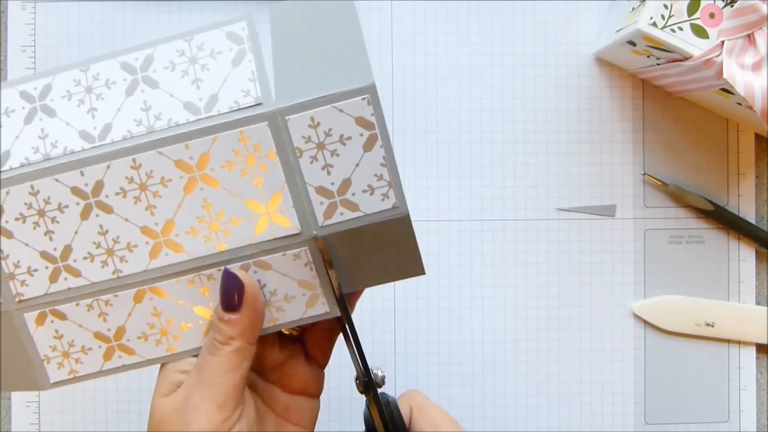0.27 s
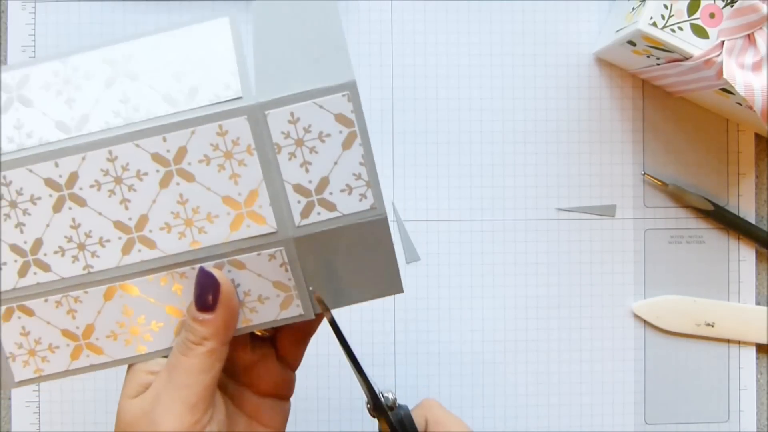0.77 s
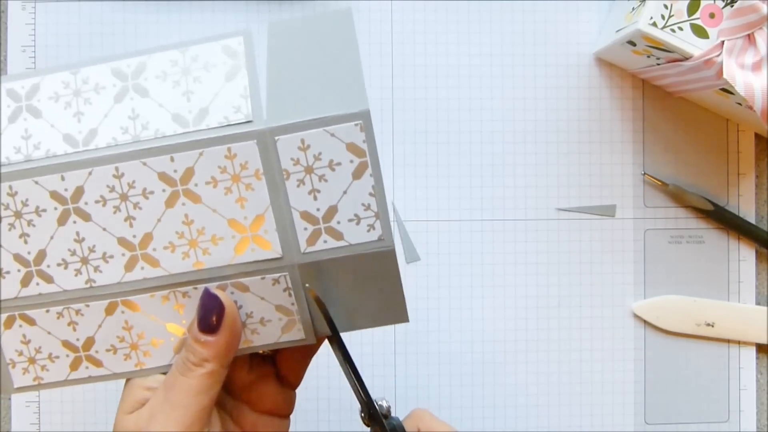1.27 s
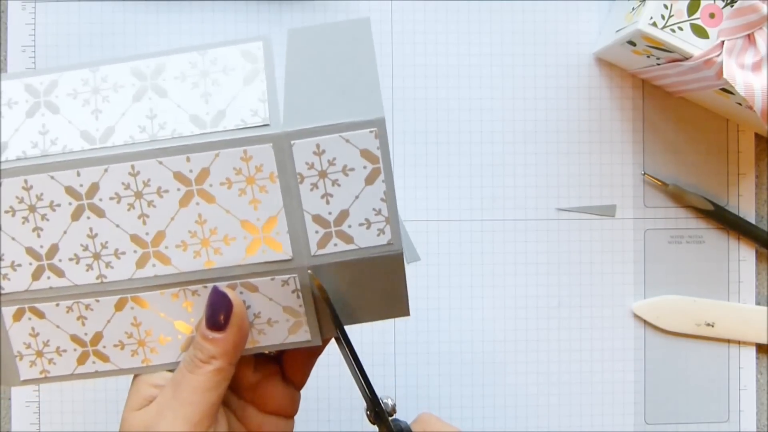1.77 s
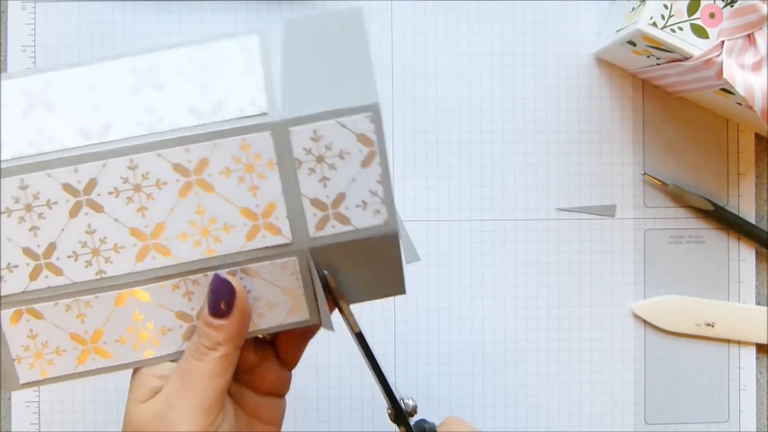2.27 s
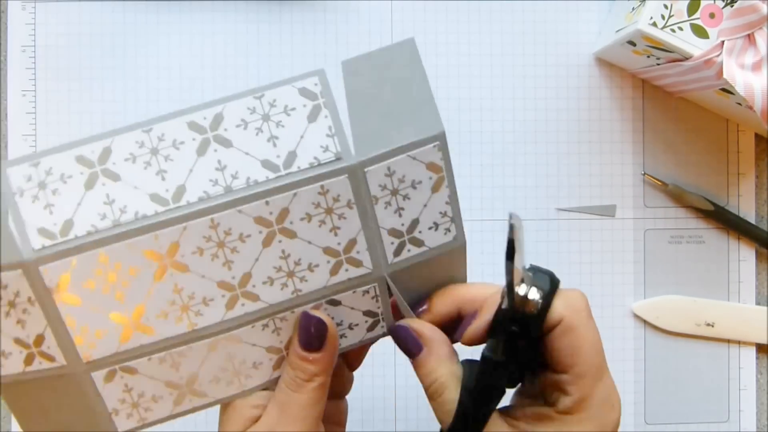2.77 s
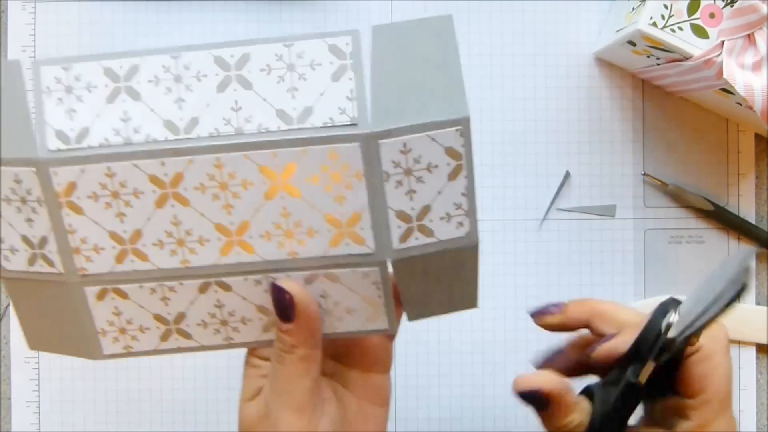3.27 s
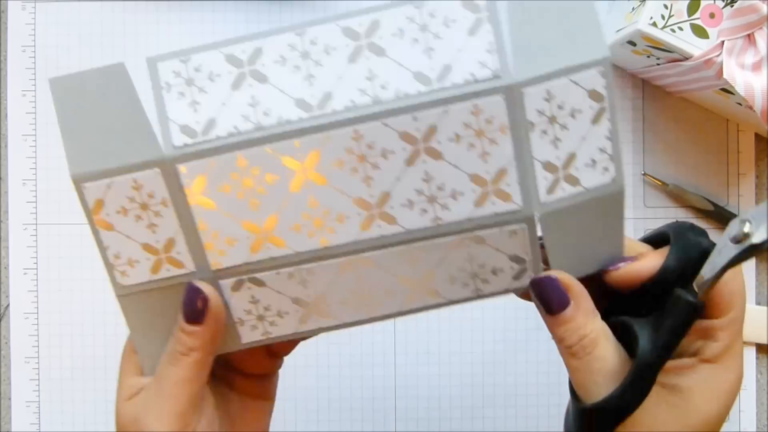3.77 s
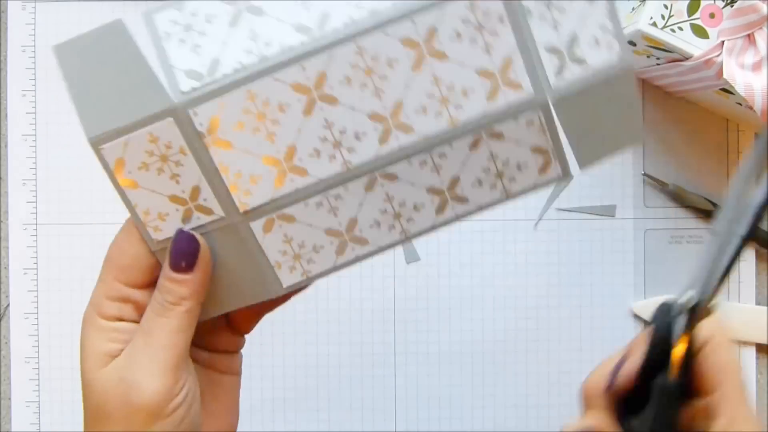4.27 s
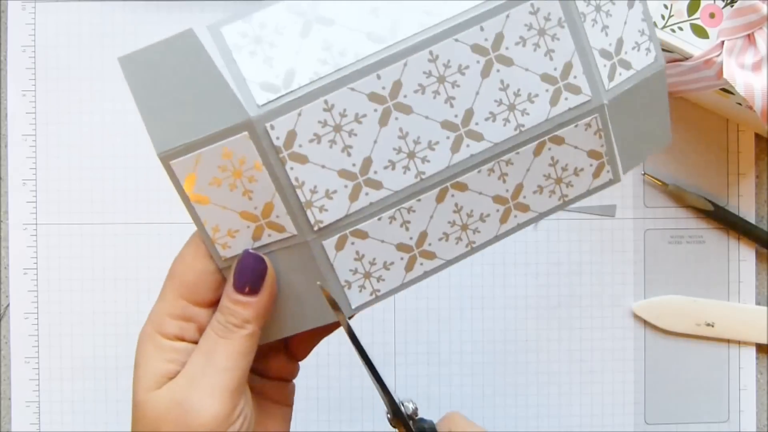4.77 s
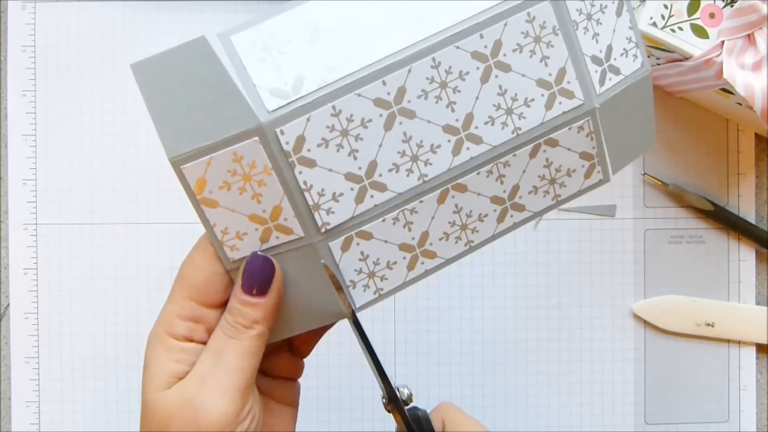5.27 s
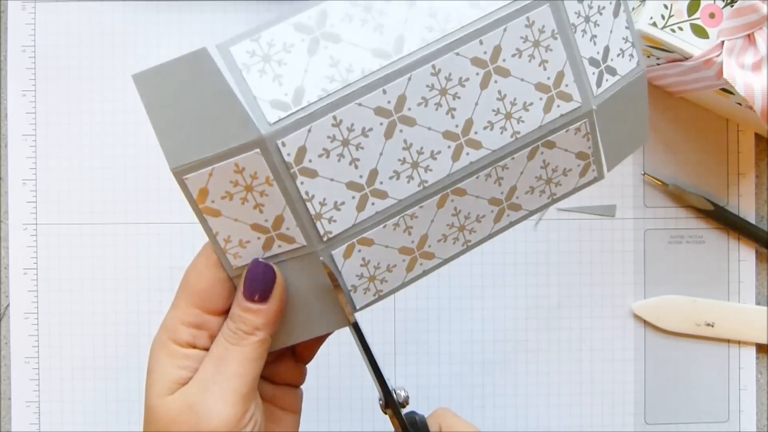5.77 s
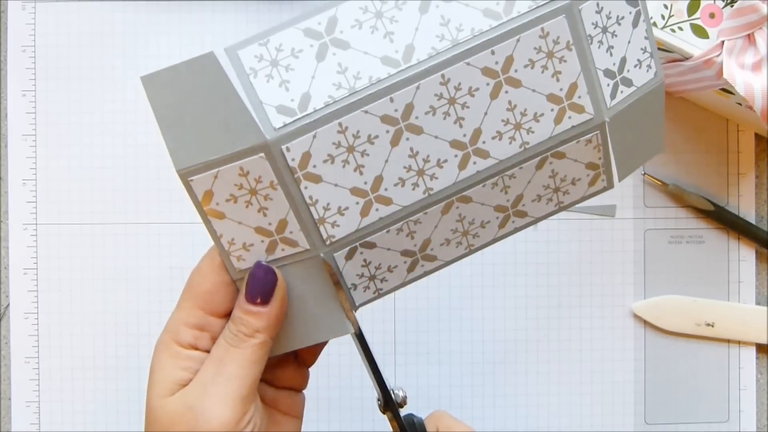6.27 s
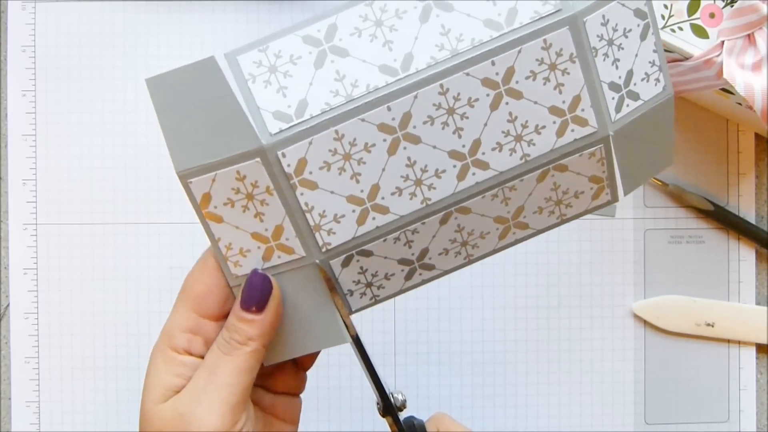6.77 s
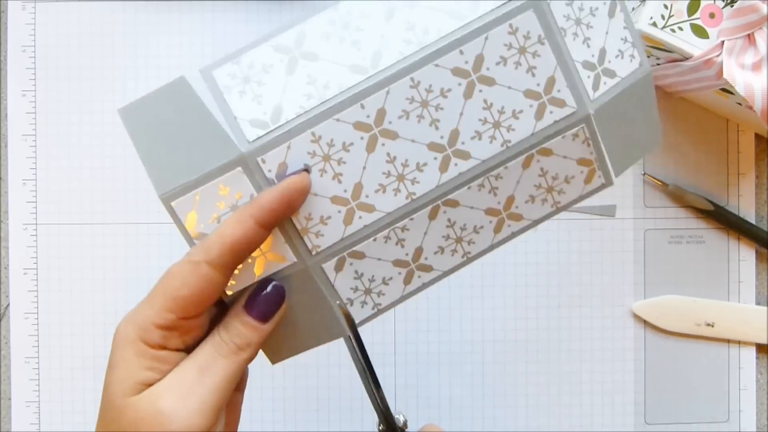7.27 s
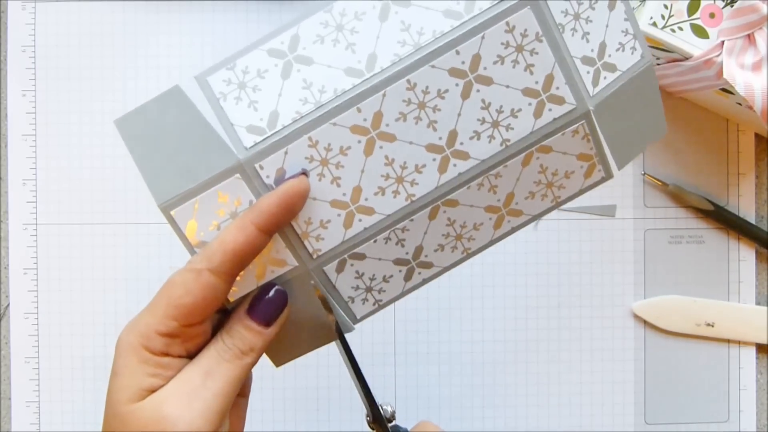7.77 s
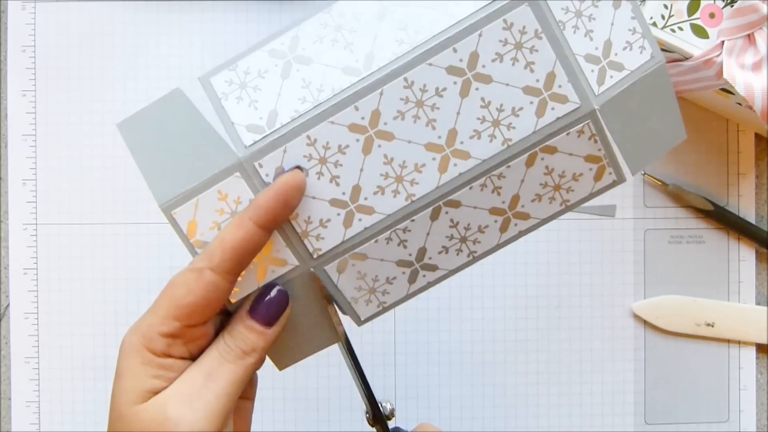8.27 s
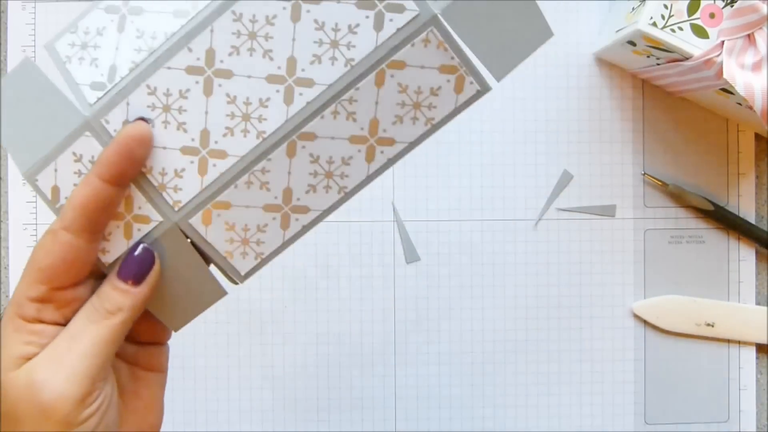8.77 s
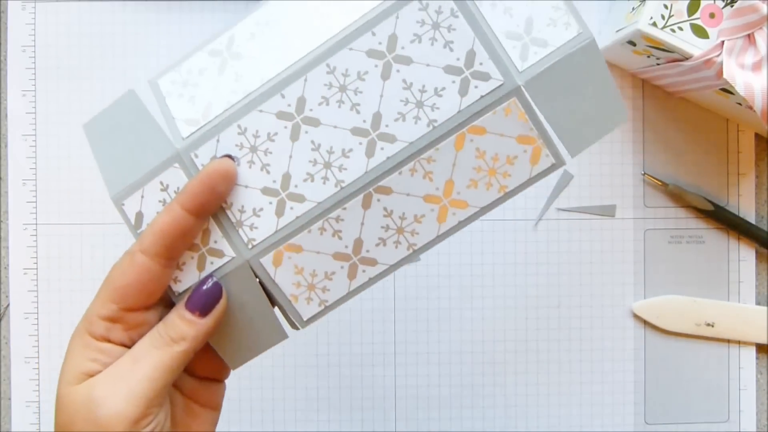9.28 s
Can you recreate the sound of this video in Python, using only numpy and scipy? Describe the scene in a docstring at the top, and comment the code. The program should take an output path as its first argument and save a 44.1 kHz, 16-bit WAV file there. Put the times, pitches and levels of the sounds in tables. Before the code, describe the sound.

Quiet indoor room tone, soft hiss with faint low rumble, close stereo microphones. Tiny card ticks open, with a short gritty snip at 0.4 s, a light slide around 1.1 and crisp crunches from 1.5 to 2.3, with a sharp snap near 1.9. From 2.4 to 4.3 the card is handled: dry papery taps, small high blade clinks, soft rustling slides. At about 4.4 a bright metallic scrape and clinks with hard card snaps; another steel tick at 4.7. Slow cutting from 5.5 to 6.7, a grainy crackle of fibres parting in little ticks. Fingers rub and tap the card from 6.8 to 7.5. Finer, brighter crackling cuts run 7.75 to 8.6, closing with a snip and clink. At 9.0 the scissors are laid down: loud knock, high metallic rattle, rustle, then a deeper woody thump at 9.3 dying away.

```python
"""Small steel scissors cut slowly through card held over a craft table in a quiet room.
From the outset lie the room's hum and hiss and a far rumble, both shaped noise; card snaps as filtered bursts.
Then fibres tear as clumped grains, loose blades clink in steel modes, rubs sing in one resonance,
and fingers slide as a dense rustle. Later contacts ring clear notes; at the end the scissors are laid down.
Feedback delays give the room's echo; two close microphones hear the treble differently."""
import sys
import numpy as np
from scipy import signal
from scipy.fft import rfft, irfft, next_fast_len
from scipy.io import wavfile
from scipy.ndimage import uniform_filter1d

SR = 44100
rng = np.random.default_rng(int(sys.argv[2]) if len(sys.argv) > 2 else 0)


def unload_audio(sound):
    """Save the sound as a 16-bit wav file, at the path given as the first command line argument."""
    columns = np.transpose(np.atleast_2d(sound))
    # keep every value between -1 and 1, then stretch to whole-number steps
    steps = np.round(np.clip(columns, -1, 1) * 32767)
    wavfile.write(sys.argv[1], SR, steps.astype(np.int16))


N = 420713

# Spectrum of the room tone. Each row: frequency in Hz, relative spectral level in dB per Hz.
ROOM_SPECTRUM = [(35, -52), (72, -12.5), (100, -5), (238, -9.5), (280, -7), (353, -8.5), (513, -11.5),
                 (632, -13.5), (694, -12), (940, -8.5), (1030, -13.5), (1270, -13), (2180, -20.5),
                 (2880, -20.5), (15800, -28)]
# Course of the far rumble. Each row: time in seconds, level in dB.
RUMBLE_COURSE = [(0, -72.5), (2.92, -72.5), (3.05, -66), (5.21, -69), (5.42, -77), (9.54, -79)]
ROOM_TONE_DB = -62

# The card snaps or knocks on hand and table.
# Each row: start in seconds, snap drive in dB, thud drive in dB, rattle t60 in seconds.
KNOCKS = [(.0313, -40.5, -62, 0.043), (.054, -39.5, -64, 0.035), (.547, -41, -51.5, 0.052),
          (.624, -45, -54.5, 0.11), (1.3004, -49.5, -51.5, 0.14), (1.7432, -41.5, -62, 0.063),
          (1.8573, -25, -53.5, 0.052), (1.8819, -36, -64, 0.15), (2.0978, -40.5, -84, 0.12),
          (2.2088, -32, -49, 0.039), (2.3007, -27, -54, 0.028), (2.503, -36.5, -60.5, 0.16),
          (2.6772, -32, -51, 0.041), (2.767, -35, -43.5, 0.022), (2.809, -37, -50.5, 0.12),
          (2.9605, -24.5, -46, 0.025), (3.03, -28, -48, 0.034), (3.1859, -33.5, -50.5, 0.04),
          (3.2055, -33.5, -55, 0.067), (3.268, -45, -54.5, 0.056), (3.4651, -35.5, -41.5, 0.015),
          (3.4905, -39, -46.5, 0.11), (4.2103, -39.5, -44.5, 0.028), (4.4258, -25, -35.5, 0.06),
          (4.4594, -27, -46, 0.12), (4.487, -25.5, -45, 0.039), (4.609, -43.5, -58.5, 0.065),
          (4.67, -29, -55, 0.046), (4.75, -59, -51.5, 0.1), (6.7, -38, -84, 0.08),
          (7.0841, -36, -42, 0.075), (7.2335, -42, -52, 0.052), (7.25, -44, -48.5, 0.036),
          (7.403, -63, -57, 0.039), (8.4129, -59, -46, 0.067), (8.588, -26, -43, 0.039),
          (8.642, -30.5, -49, 0.032), (8.941, -42, -71, 0.068), (9.0274, -17, -25.5, 0.082),
          (9.2655, -37, -38, 0.1), (9.2801, -43, -33, 0.031), (9.2952, -26.5, -32, 0.21),
          (9.3237, -32.5, -25, 0.25)]
# Modes of table top and card. Each row: frequency in Hz, strength in dB, t60 in seconds.
BODY_MODES = [(290, -3, .015), (366, 4, .025), (598, 4, .045), (883, 1, .022), (1180, -1, .018),
              (1460, 1, .02), (1980, -2, .012), (2390, -4, .012), (3080, -2, .012)]
FIRST_TOUCH = .8   # firm first contact of a knock, beside a rattle of unit energy
STRIKE_SPREAD_DB = 3
DETUNE = .03   # spread of a 300 Hz mode from blow to blow, as grip and contact change (share of pitch)

# The blades close on the card. Each row: start in seconds, length before the fall in seconds,
# tearing level in dB at start and at end, fine hiss in dB re tearing, card pitch excited most in Hz.
CUTS = [(0.427, 0.15, -47.5, -61.5, -5, 1860), (1.494, 0.11, -44, -55.5, -6, 3830),
        (1.595, 0.098, -47, -60, -4.5, 3720), (1.838, 0.19, -53, -54, -1, 4140),
        (2.088, 0.23, -61, -48.5, -5, 3800), (5.484, 0.38, -60, -54, -6.5, 1380),
        (5.875, .33, -56.5, -61.5, -4.5, 2420), (6.217, 0.16, -49.5, -66.5, -5.5, 2560),
        (6.519, 0.12, -60.5, -78, -1.5, 2560), (7.752, 0.23, -52.5, -62, -5.5, 1530),
        (7.986, 0.36, -55.5, -58, -2.5, 1560), (8.382, .14, -45.5, -54.5, -5, 1530),
        (8.531, 0.068, -57, -43, -3.5, 1430)]
# The largest bundles of fibres give way. Each row: time in seconds, nominal peak in dB.
SLIPS = [(1.916, -36), (1.969, -31.5), (5.61, -32.5), (5.821, -35), (5.845, -42), (5.888, -30.5),
         (5.932, -40), (5.956, -30), (5.972, -34.5), (6.0165, -34.5), (6.083, -47), (6.105, -60),
         (6.179, -39), (6.2357, -46), (6.269, -37), (6.3075, -41), (6.3894, -34), (6.8287, -38),
         (6.88, -35), (7.9448, -38), (7.9643, -36), (8.0053, -32.5), (8.0397, -32.5), (8.071, -37),
         (8.0885, -35.5), (8.1264, -32.5), (8.201, -32.5), (8.2575, -34.5), (8.2782, -29.5), (8.304, -34.5),
         (8.416, -27.5), (8.4678, -29), (8.556, -36), (8.576, -30)]
# Resonances of the held card. Each row: frequency in Hz, width in Hz, strength in dB.
CARD_RESONANCES = [(480, 320, 9), (1560, 480, 2), (2550, 480, 2)]
CUT_RISE_S, CUT_FALL_S = 0.017, 0.027
SLIP_RISE_S, SLIP_T60_S, SLIP_CREST_DB = .002, 0.045, 11
SMALL_SLIPS_PER_S, SMALL_SLIP_SPREAD_DB = 60, 3   # at random
SMALL_SLIP_DB, STEADY_TEAR_DB = -4, -1   # re tearing level
FIBRE_EDGES_HZ = [530, 1100, 2000, 3300, 4900, 7200]
FIBRE_WANDER_DB = 4   # each band of the tearing swells on its own

# The loose blades clink. Each row: start in seconds, low clatter drive in dB, high sizzle drive in dB,
# rattle t60 in seconds, high pitch rung most in Hz.
CLINKS = [(.624, -68, -52.5, 0.037, 11200), (1.8819, -44, -69, 0.21, 11000),
          (2.503, -44.5, -44.5, 0.13, 10900), (2.5309, -40, -33.5, 0.093, 11500),
          (2.5434, -29.5, -41.5, 0.039, 11900), (2.6108, -51.5, -50.5, 0.12, 10800),
          (2.7382, -46.5, -38.5, 0.11, 10360), (2.9605, -62, -34, 0.019, 9500),
          (3.03, -30, -29, 0.052, 11000), (3.1859, -62, -46, 0.021, 11600),
          (3.2055, -43, -40.5, 0.074, 11800), (3.33, -52, -49, 0.059, 10900),
          (4.4258, -38, -35.5, 0.12, 12300), (4.44, -45, -20.5, 0.1, 11600),
          (4.4594, -39, -48, 0.067, 10980), (4.486, -59, -21, 0.11, 12900),
          (4.487, -62, -20.5, 0.087, 7500), (4.664, -35, -31, 0.032, 11100),
          (4.6705, -38.5, -25, 0.065, 11300), (4.7192, -48, -41, 0.11, 11200),
          (5.097, -51, -49.5, 0.092, 11900), (8.6435, -33.5, -29, 0.05, 11160),
          (8.7208, -56, -48, 0.079, 10800), (8.9408, -61, -44.5, 0.096, 11600),
          (9.0274, -38, -36, 0.083, 11000), (9.1266, -42.5, -40.5, 0.16, 11200),
          (9.1443, -65, -28, 0.16, 8100), (9.2952, -32, -22, 0.045, 7800), (9.368, -58, -31.5, 0.1, 8640)]
# Modes of the blades. Each row: frequency in Hz, strength in dB, t60 in seconds.
BLADE_MODES = [(4240, -9, .02), (4880, -5, .015), (5240, -1, .03), (5420, -1, .03), (5850, -5, .02),
               (6740, -9, .02), (7190, -8, .02), (7700, -8, .015), (10600, -1, .018), (10900, -1, .018),
               (11300, -1, .018), (11550, -2, .015), (12000, -3, .015), (12600, 0, .012), (13900, -7, .012)]
BENDING_TOP_HZ = 6500   # modes below follow the clatter, those above the sizzle
LOW_RING_DB, HIGH_RING_DB = -3, -1   # blade modes re clatter and sizzle
RING_FOCUS_DB = 35   # loss per octave from the favoured pitch

# Rubbing that sings in one resonance of blade or card. Each row: start in seconds,
# length before the fall in seconds, level in dB at start and at end, frequency in Hz, width setting in Hz.
RUBS = [(0.637, .2, -64, -77, 11300, 120), (0.665, .17, -72, -74, 4200, 120),
        (4.253, 0.07, -58, -63.5, 4050, 500), (4.439, 0.13, -24, -56, 5340, 250),
        (7.312, 0.065, -57, -55.5, 1630, 500), (9.145, 0.065, -39, -51, 8150, 700)]
RUB_EDGE_S = .012

# Fingers and blades slide on the card. Each row: start in seconds, length before the fall in seconds,
# level in dB at start and at end, sheet flexing in dB re sliding, fine hiss in dB re sliding.
SLIDES = [(.64, 0.18, -65, -73.5, 4.5, 0), (1.09, 0.11, -73.5, -71.5, 11.5, -16),
          (1.77, 0.05, -55, -58, -24, -20), (2.389, 0.19, -55.5, -69, -22, -3),
          (2.68, 0.13, -80, -53.5, -10, 3), (2.846, 0.12, -51, -48.5, -8.5, 0),
          (3.02, 0.44, -57, -69, -5, 3), (3.52, 0.095, -61, -59.5, -17, 1), (3.636, 0.14, -45, -49, -17, 2),
          (3.823, 0.21, -48.5, -57.5, -5, 3.5), (4.058, 0.15, -60, -57, 0.5, -1.5),
          (4.236, 0.17, -56.5, -62.5, 0.5, -6), (4.498, 0.15, -44, -78.5, 1.5, 8),
          (4.672, 0.15, -56, -62, -1, 3.5), (4.822, 0.1, -57.5, -60.5, 2.5, -7),
          (5.12, 0.096, -54.5, -75.5, 6.5, -7), (6.817, 0.26, -53.5, -64, -9.5, -1),
          (7.126, 0.12, -44, -59.5, -1, -3.5), (7.294, 0.063, -54, -57, 6.5, -7),
          (7.4, 0.12, -72, -64, 7, -15.5), (9.046, 0.086, -40.5, -72, 13, 6.5),
          (9.128, 0.13, -49.5, -64.5, 6.5, 11.5), (9.27, 0.17, -34, -69, 8.5, -6)]
SLIDE_RISE_S, SLIDE_FALL_S = 0.028, 0.065
SHEET_HZ = [847, 1720, 2180, 2830, 3870]   # resonances that a slide wakes by turns
SHEET_WIDTH_HZ, SHEET_DB, SHEET_WANDER_DB = 290, -16, 8

# Contacts that sound one clear note.
# Each row: start in seconds, nominal peak in dB, pitch in Hz, t60 in seconds.
NOTES = [(3.03, -23, 760, 0.014), (3.495, -36, 314, 0.051), (4.67, -28, 5480, 0.11),
         (4.722, -37, 6000, .08), (7.082, -27.5, 345, 0.027), (7.087, -40.5, 159, 0.076),
         (7.2335, -34, 1770, 0.028), (8.943, -34, 4200, 0.051), (9.03, -46, 62, .15),
         (9.03, -29, 603, 0.18), (9.287, -42, 119, 0.49)]
# Close modes of a note. Each entry: frequency as a share of its pitch.
NOTE_CLUSTER = (.975, 1, 1.03)

# Where the scissors are. Each row: time in seconds, lean to the left (no unit, later bounded by tanh).
LEAN = [(0, -.5), (3.7, 1), (4.4, -1.5), (5, -.5), (8.8, 0), (8.95, -5), (9.54, -4)]
# Weight of what differs between microphones. Each row: frequency in Hz, difference gain in dB.
DIFFERENCE_GAIN = [(60, -17), (250, -21), (500, -18), (1000, -11), (2000, -8), (4000, -5.5), (8000, -1),
                   (13000, 2)]
ROOM_T60_S, ROOM_DB = 0.23, -13.5   # t60 at low pitch; treble dies sooner
WALL_CUT_HZ = 10000
TOP_STOP_HZ = 16200   # the closing low-pass is 70 dB down from here


def from_db(db):
    """Decibels are twenty times the base-ten logarithm of gain; this inverts them."""
    return 10 ** (np.asarray(db) / 20)


def rms_one(x):
    """Signals of equal mean square carry equal power: scale to rms 1."""
    return x / np.sqrt(np.mean(x ** 2) + 1e-20)


def in_time(rows):
    """Linear interpolation carries each column of a curve to every sample."""
    s, *columns = np.transpose(rows)
    return [np.interp(np.arange(N) / SR, s, c) for c in columns]


def coloured(x, points):
    """Filtering multiplies the spectrum, here by (Hz, dB) points joined on a log-frequency axis."""
    size = next_fast_len(N)
    hz = np.maximum(np.arange(size // 2 + 1) * SR / size, 1)
    points_hz, points_db = np.array(points).T
    gain = from_db(np.interp(np.log(hz), np.log(points_hz), points_db))
    return irfft(rfft(x, size) * gain, size)[..., :N]


def band(x, low_hz, high_hz):
    """A Butterworth band-pass is maximally flat between its edges."""
    return signal.sosfilt(signal.butter(2, [low_hz, high_hz], "band", fs=SR, output="sos"), x)


def drift(rate_hz):
    """Twice-smoothed noise wanders slowly: 400 values a second of rms 1, joined by straight lines."""
    knots = np.arange(0, N / SR + 1, 1 / 400)
    r = np.exp(-2 * np.pi * rate_hz / 400)
    noise = rng.standard_normal(len(knots) + 400)
    slow = signal.lfilter([1], [1, -2 * r, r * r], noise)[400:]   # the settling second is dropped
    return np.interp(np.arange(N) / SR, knots, rms_one(slow))


def ring(x, hz, t60):
    """A damped resonator answers a unit click with a dying sine of initial height 1."""
    r = from_db(-60 / (t60 * SR))
    w = 2 * np.pi * hz / SR
    return signal.lfilter([0, np.sin(w)], [1, -2 * r * np.cos(w), r * r], x + 1e-18)


def grains(per_s, spread_db, clump_db, clumps_per_s, count):
    """Random small impacts come in clumps over a noise bed; unrelated carriers share their envelope."""
    heights = from_db(spread_db * np.minimum(rng.exponential(1, N), 4))
    sizes = heights * (rng.random(N) < per_s / SR)
    clumps = from_db(clump_db * drift(clumps_per_s))
    return clumps * (sizes + .5) * rng.standard_normal((count, 2, N))


def strokes(rows, rise_s, fall_s):
    """A friction stroke has an envelope of rise, even change in dB and fall: one gain a row."""
    out = np.zeros((len(rows), N))
    for gain, (s, length, start_db, end_db, *_) in zip(out, rows):
        at = round(s * SR)
        t = np.arange(min(round((length + fall_s) * SR), N - at)) / SR
        edges = np.clip(np.minimum(t / rise_s, (length + fall_s - t) / fall_s), 0, 1)
        level_db = start_db + (end_db - start_db) * np.minimum(t / length, 1)
        gain[at:at + len(t)] = from_db(level_db) * edges ** 2
    return out


def blows(rows, modes, voice):
    """Modal excitation: each blow's dying rattle drives modes of new strength and slightly new pitch."""
    out = np.zeros((2, N))
    t = np.arange(round(.3 * SR)) / SR
    head = t[:len(t) // 4]   # the modes are heard this long
    modes = np.array(modes)
    mode_hz, mode_db, mode_t60 = modes[:, :1], modes[:, 1], modes[:, 2:]
    noises = rng.standard_normal((len(rows), 2, 2, len(t)))
    shares = rng.standard_normal((len(rows), 3, len(modes)))
    for (s, first_db, second_db, t60, *more), noise, share in zip(rows, noises, shares):
        # stiff high modes shift least
        hz = mode_hz * (1 + DETUNE * share[2, :, None] * np.sqrt(300 / mode_hz))
        rings = from_db(-60 * head / mode_t60) * np.sin(2 * np.pi * hz * head)
        heights = from_db(mode_db + STRIKE_SPREAD_DB * share[:2])
        rattle = from_db(-60 * t / max(t60, .01)) * (1 - np.exp(-t / .0005))
        at = round(s * SR)
        sound = voice(first_db, second_db, rattle, noise, heights, rings, *more)
        out[:, at:at + len(t)] += sound[:, :N - at]
    return out


def background():
    """Stationary noise has a fixed spectrum, the room tone; low-band noise swells and fades as rumble."""
    tone = coloured(rng.standard_normal((2, N)), ROOM_SPECTRUM)
    rumble = band(rng.standard_normal((2, N)), 34.0, 53.0)
    rumble_gain = from_db(in_time(RUMBLE_COURSE)[0])
    return from_db(ROOM_TONE_DB) * rms_one(tone) + rumble_gain * rms_one(rumble)


def knock(snap_db, thud_db, rattle, noise, heights, rings):
    """Impulse response: card snaps as a noise burst, while its body and the table answer the push."""
    push = noise[1] * rattle ** 1.78
    push = push / np.sqrt(np.sum(push ** 2, axis=1, keepdims=True))
    push[:, 0] = FIRST_TOUCH
    answer = signal.fftconvolve(heights @ rings, push, axes=1)[:, :len(rattle)]
    snap = band(noise[0] * rattle, 1396, 7740)
    return from_db(snap_db) * snap + from_db(thud_db) * band(answer, 180, 7000)


def tearing_force():
    """Stick and slip: a steady tear is joined by sudden releases that die away; also returns the level."""
    level = strokes(CUTS, CUT_RISE_S, CUT_FALL_S).sum(axis=0)
    small = from_db(SMALL_SLIP_DB + SMALL_SLIP_SPREAD_DB * rng.standard_normal(N))
    starts = level * small * (rng.random(N) < SMALL_SLIPS_PER_S / SR)
    for s, peak_db in SLIPS:
        starts[round(s * SR)] = from_db(peak_db - SLIP_CREST_DB)
    releases = signal.lfilter([1], [1, -from_db(-60 / (SLIP_T60_S * SR))], starts + 1e-18)
    force = from_db(STEADY_TEAR_DB) * level + releases
    # a running mean over past samples gives each slip its rise
    return uniform_filter1d(force, size=round(SLIP_RISE_S * SR), origin=round(SLIP_RISE_S * SR / 2) - 1)


def cutting():
    """Forced resonance: parting fibres drive the held card, most strongly nearest each cut's own pitch."""
    t = np.arange(N) / SR
    starts_s, *_, hiss_db, pitch_hz = np.transpose(CUTS)
    latest = np.maximum(np.searchsorted(starts_s, t + .01) - 1, 0)   # the cut in force
    force = tearing_force()
    broad, fine, *tear = grains(1800, 3, 2.5, 90, count=5)
    rung = 0
    for source, (hz, width, db) in zip(tear, CARD_RESONANCES):
        octaves_away = np.minimum(np.abs(np.log2(hz / pitch_hz[latest])), 1)
        gain = from_db(db - 14 * octaves_away + 3 * drift(25))
        rung = rung + gain * rms_one(ring(source, hz, 2.2 / width))
    fibres = 0
    for low, high in zip(FIBRE_EDGES_HZ, FIBRE_EDGES_HZ[1:]):
        swell = from_db(FIBRE_WANDER_DB * drift(15.8))
        fibres = fibres + swell * band(broad, low, high) * (high / 5000) ** -.4
    body = from_db(-5) * band(rung, 440, 11000) + from_db(-5.0) * rms_one(fibres)
    hiss = from_db(hiss_db[latest]) * rms_one(band(fine, 2100, 10200))
    return force * (body + hiss)


def clink(clatter_db, sizzle_db, rattle, noise, heights, rings, favoured_hz):
    """Repeated contact: blades clatter at the loose pivot and ring the steel, highs near a favoured pitch."""
    hz = np.array(BLADE_MODES)[:, 0]
    high_db = sizzle_db + HIGH_RING_DB - RING_FOCUS_DB * np.abs(np.log2(hz / favoured_hz))
    heights = heights * from_db(np.where(hz < BENDING_TOP_HZ, clatter_db + LOW_RING_DB, high_db))
    # with unit energy, steady rattle passes at its own level
    rings = rings / np.sqrt(np.sum(rings ** 2, axis=1, keepdims=True))
    rung = signal.fftconvolve(heights @ rings, noise[1] * rattle, axes=1)[:, :len(rattle)]
    clatter = from_db(clatter_db) * band(noise[1] * rattle, 4300, 6400)
    sizzle = from_db(sizzle_db) * band(noise[0] * rattle, .85 * favoured_hz, 1.2 * favoured_hz)
    return band(rung, 3000, 16000) + clatter + sizzle


def rubs():
    """Resonant selection: rough rubbing noise sent twice through one resonance sings at its pitch."""
    out = np.zeros((2, N))
    for gain, (s, *_, hz, width) in zip(strokes(RUBS, RUB_EDGE_S, RUB_EDGE_S), RUBS):
        span = slice(round(s * SR), round(s * SR) + SR // 3)
        noise = rng.standard_normal((2, SR // 3))
        once = ring(noise, hz, 1.4 / width)
        out[:, span] += gain[span] * rms_one(ring(once, hz, 1.4 / width))
    return from_db(3 * drift(40)) * out


def sliding():
    """Sliding friction: dense, even contacts rustle and wake the sheet's resonances by turns; it flexes below."""
    gains = strokes(SLIDES, SLIDE_RISE_S, SLIDE_FALL_S)
    *_, flex_db, hiss_db = np.transpose(SLIDES)
    flexing, middle, fine, drive = grains(9000, 1.5, 1.2, 30, count=4)
    flex = from_db(flex_db) @ gains * rms_one(band(flexing, 249.2, 1560))
    rustle = gains.sum(axis=0) * rms_one(band(middle, 1700, 6240))
    hiss = from_db(hiss_db) @ gains * rms_one(band(fine, 5860, 12900))
    sheet = 0
    for hz in SHEET_HZ:
        wander = from_db(SHEET_DB + SHEET_WANDER_DB * drift(3.8))
        sheet = sheet + wander * rms_one(ring(drive, hz, 2.3 / SHEET_WIDTH_HZ))
    return flex + rustle + hiss + gains.sum(axis=0) * band(sheet, 600, 6300)


def notes():
    """Free vibration: one push sets a cluster of close modes ringing, softened by a band-pass."""
    out = np.zeros((2, N))
    for s, peak_db, hz, t60 in NOTES:
        push = np.zeros(N)
        push[round(s * SR)] = from_db(peak_db)
        cluster = np.mean([ring(push, hz * k, t60) for k in NOTE_CLUSTER], axis=0)
        out += band(cluster, hz / 2, hz * 2)
    return out


def room(x):
    """Reverberation: feedback delays dull on every round, six for the shared and six for the differing part."""
    out = np.zeros((2, N))
    dull = np.exp(-2 * np.pi * WALL_CUT_HZ / SR)
    for k, lag in enumerate((rng.uniform(.009, .03, 12) * SR).astype(int)):
        loop, state = x.copy(), [0.]
        gain = from_db(-60 * lag / SR / ROOM_T60_S)
        for i in range(lag, N, lag):   # one round at a time
            back, state = signal.lfilter([gain * (1 - dull)], [1, -dull], loop[i - lag:i], zi=state)
            loop[i:i + lag] += back[:N - i]
        out[k % 2] += (loop - x) * (-1) ** (k // 2)
    return out


def microphones(pair):
    """Sum and difference: row 0 is shared, row 1 differs between sides, weighted towards the treble."""
    side = coloured(pair[1], DIFFERENCE_GAIN)
    return np.array([pair[0] + side, pair[0] - side])


def scene():
    """Superposition: hands, card and scissors add up in the room before the microphones."""
    knocks = blows(KNOCKS, BODY_MODES, knock)
    clinks = blows(CLINKS, BLADE_MODES, clink)
    shared, differing = knocks + cutting() + clinks + rubs() + sliding() + notes()
    # a source off centre leans mostly in the treble
    differing = differing + np.tanh(in_time(LEAN)[0] / 12) * shared
    return microphones([shared, differing] + from_db(ROOM_DB) * room(shared) + background())


def record(dry):
    """Band limitation: a steep low-pass cuts the top, and the left side is a little quieter."""
    low_pass = signal.cheby2(14, 70, TOP_STOP_HZ, fs=SR, output="sos")
    return signal.sosfilt(low_pass, dry * from_db([[-.3], [.3]]))


dry = scene()
out = record(dry)
unload_audio(out)
```